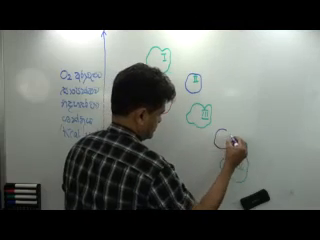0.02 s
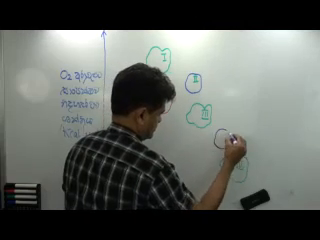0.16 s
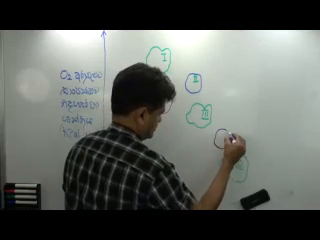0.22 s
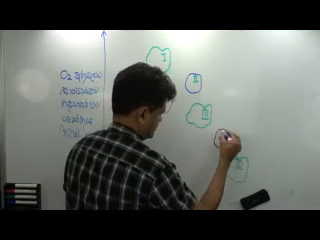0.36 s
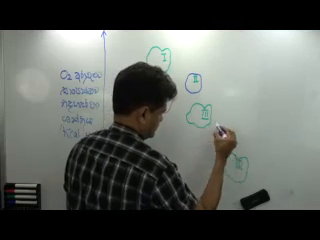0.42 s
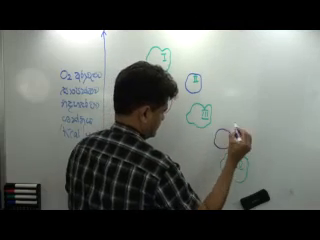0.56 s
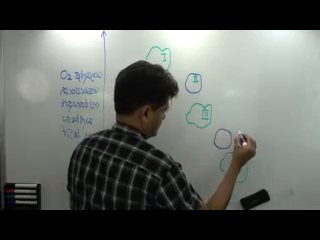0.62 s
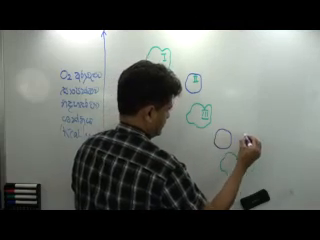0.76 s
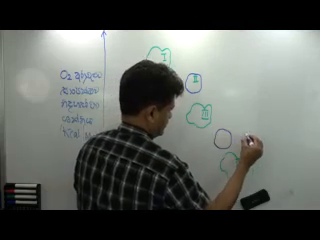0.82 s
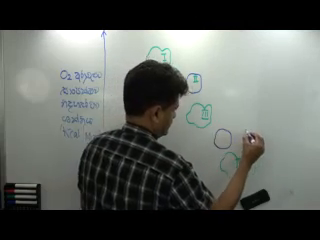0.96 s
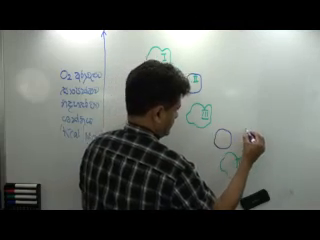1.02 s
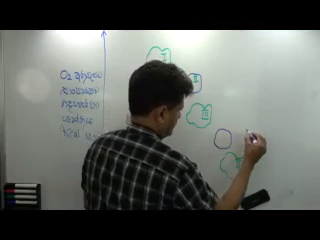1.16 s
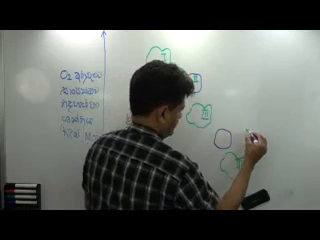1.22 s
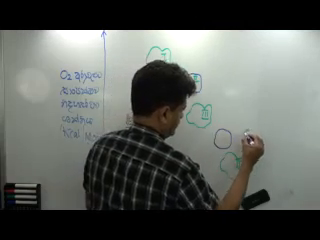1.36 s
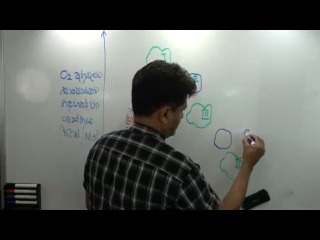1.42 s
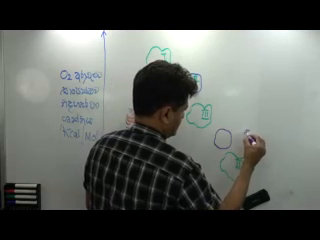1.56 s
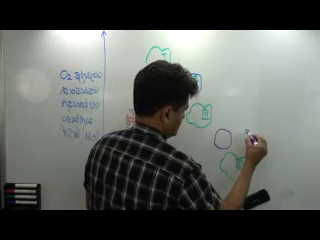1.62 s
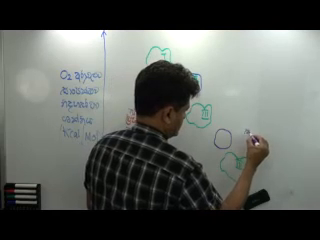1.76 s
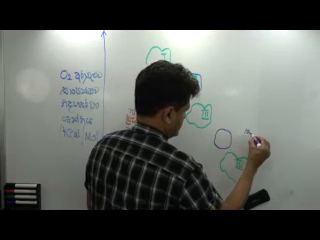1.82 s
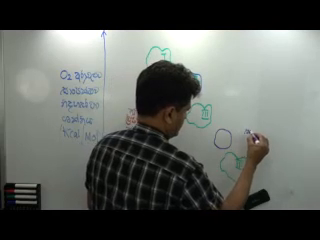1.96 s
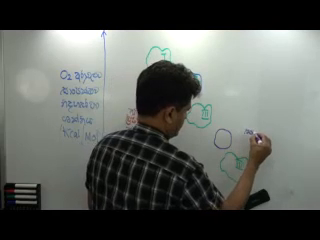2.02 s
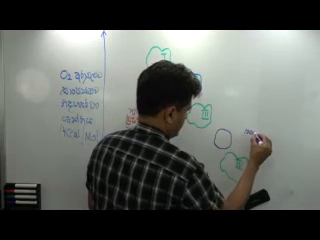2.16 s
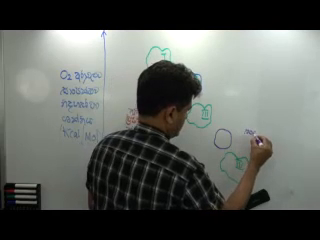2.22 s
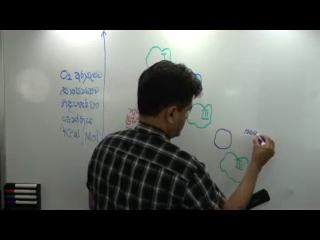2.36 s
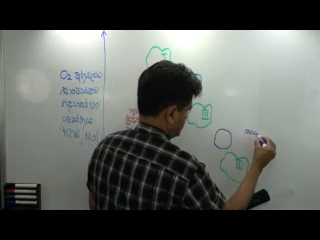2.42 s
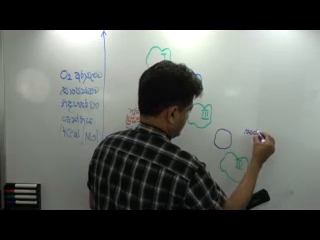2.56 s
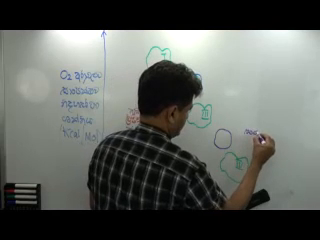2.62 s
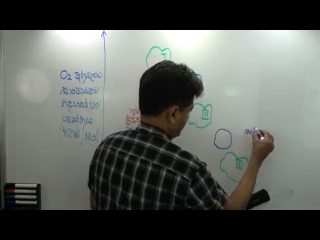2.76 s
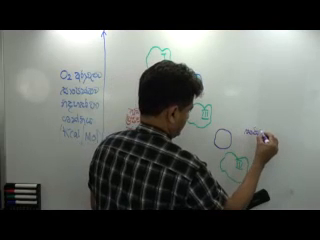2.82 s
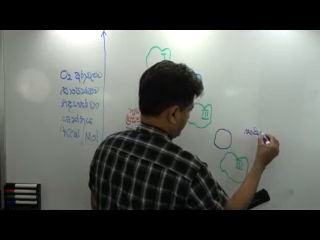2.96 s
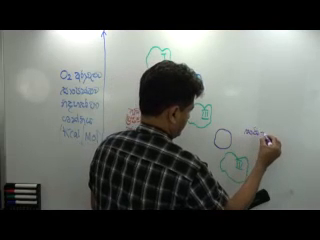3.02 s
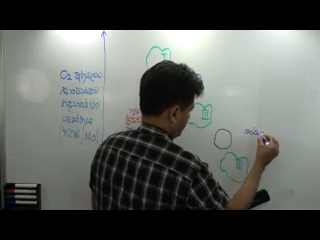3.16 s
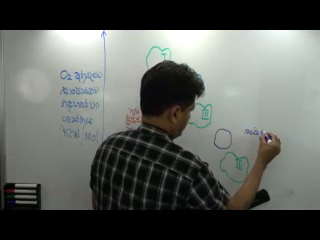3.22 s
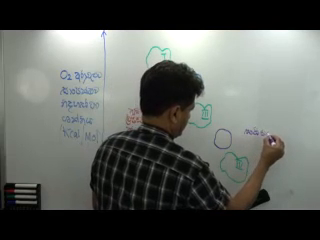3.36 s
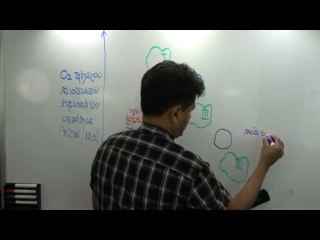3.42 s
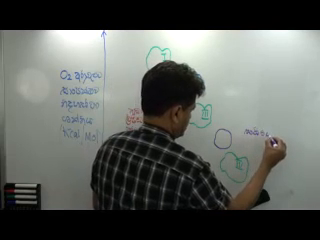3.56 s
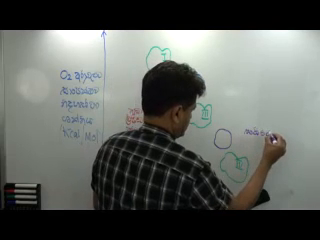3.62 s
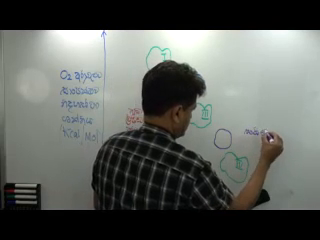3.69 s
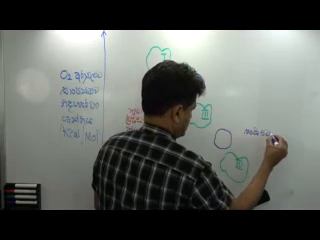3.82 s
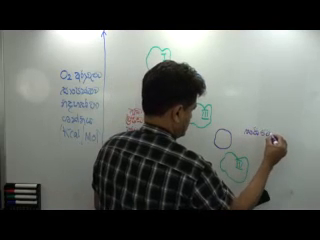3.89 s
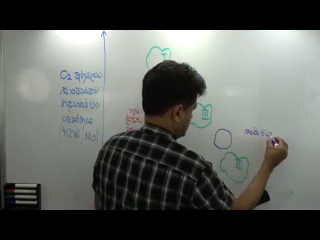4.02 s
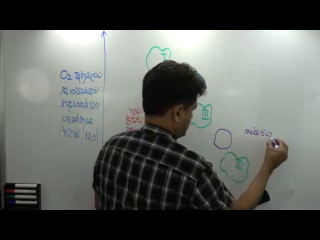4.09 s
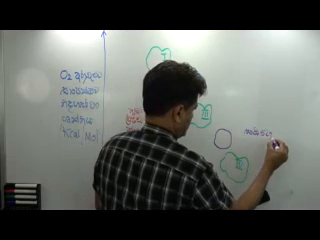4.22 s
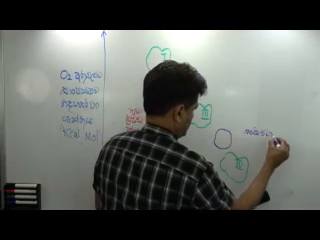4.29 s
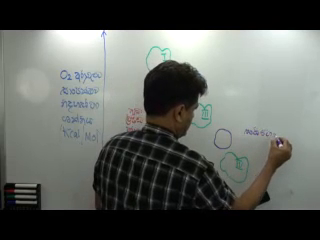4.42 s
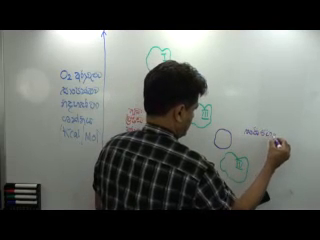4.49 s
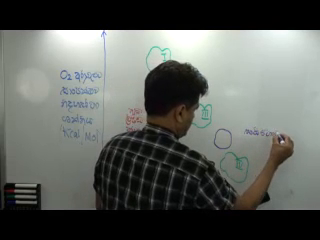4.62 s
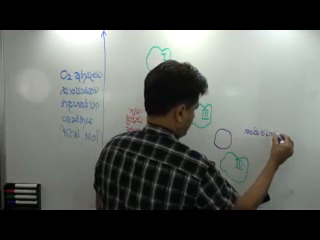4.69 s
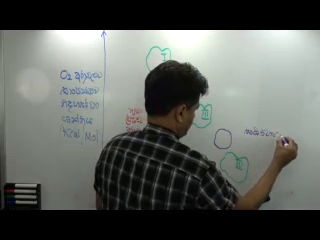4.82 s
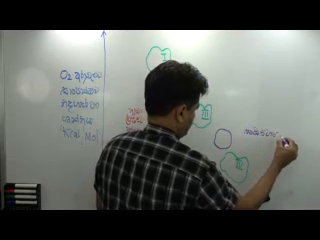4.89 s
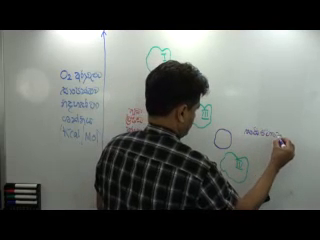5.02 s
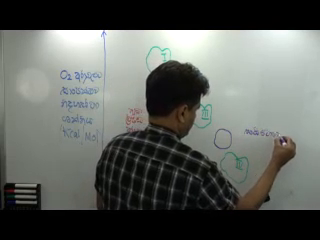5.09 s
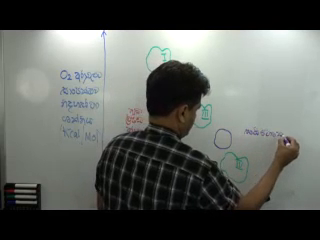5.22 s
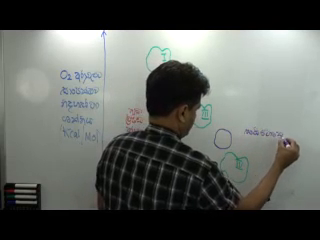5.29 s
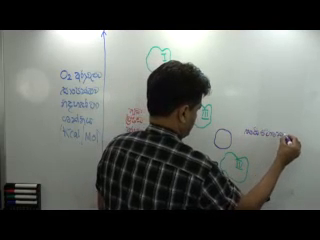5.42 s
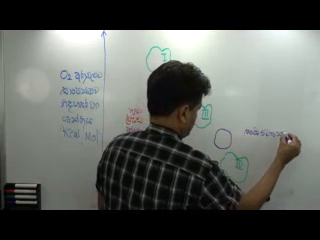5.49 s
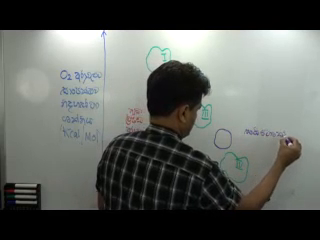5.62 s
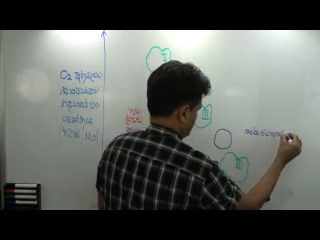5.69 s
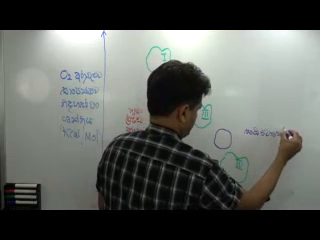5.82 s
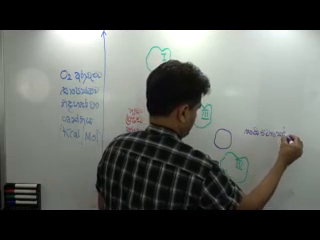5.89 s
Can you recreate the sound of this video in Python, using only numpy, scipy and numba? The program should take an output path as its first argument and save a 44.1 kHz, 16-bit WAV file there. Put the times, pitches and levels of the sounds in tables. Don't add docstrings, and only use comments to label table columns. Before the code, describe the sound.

In a quiet classroom a felt marker first rubs softly on a whiteboard, closing a circle, then pauses. From about one second it writes letters: hollow low thumps of the tip landing on the panel, tiny plastic clicks and short dry squeaks, quick at first and later more spaced. Heard from a few metres by a camera microphone, with a short room tail, faint fan noise and mains hum.

```python
import sys
import numpy as np
from scipy import signal
from scipy.fft import rfft, irfft, next_fast_len
from scipy.io import wavfile
from scipy.ndimage import uniform_filter1d
from numba import njit

SR = 44100
rng = np.random.default_rng(int(sys.argv[2]) if len(sys.argv) > 2 else 0)


def amplitude_ratio(level_db):
    exponent = np.asarray(level_db, float) / 20
    return 10 ** exponent


def to_wav(s):
    ch = np.atleast_2d(s).T
    pcm = np.round(np.clip(ch, -1, 1) * 32767)
    wavfile.write(sys.argv[1], SR, pcm.astype(np.int16))


N = 262615
T = np.arange(N) / SR
LEFT_RIGHT = np.array([[1], [-1]])

# start in seconds, peak level in dB, hardness as level of the upper modes in dB,
# wall shudder in dB, left minus right in dB.
LANDINGS = [(0.455, -84, -6, -53, 3), (1.156, -28, -28, -45, -1.5), (1.319, -47, -36, -50, 2.5),
            (1.367, -65, -10, -66, -5), (1.601, -27.5, -25.5, -37, 2.5), (1.827, -45, -31, -57, 3),
            (2.088, -30.5, -12, -52, 4.5), (2.214, -25.5, -30, -42, 2.5), (2.447, -53, -24, -52, 6),
            (2.483, -44, -37, -55, 4.5), (2.566, -38, -9.5, -58, 1.5), (2.689, -45, -19, -54, 2.5),
            (3.009, -31.5, -46, -45, -2), (3.437, -33, -38, -44, 1.5), (4.007, -34, -37, -43, 2),
            (4.43, -33.5, -38, -48, 2), (4.811, -25, -14.5, -45, 5.5), (5.01, -44, -13.5, -55, 5.5),
            (5.167, -42, -10.5, -50, 2), (5.569, -25, -17, -48, 1), (5.868, -22.5, -3, -62, 0.5)]
# frequency in Hz, level in dB, 60 dB decay time in seconds.
PANEL_MODES = [(95.7, -9.5, 0.19), (135.5, -11.5, 0.16), (159, -1, 0.097), (190.3, -8, 0.11),
               (195.3, 4.5, 0.1), (211.6, -11.5, 0.19), (252.4, -20, 0.2), (285, -14, 0.068),
               (344.2, 5.5, 0.14), (388.4, 0, 0.2), (448, -10.5, 0.35), (498, 10, 0.071),
               (538.2, 6.5, 0.08), (607, -6, 0.26), (699.3, -6.5, 0.15), (795, -6.5, 0.094),
               (815, -35, 0.089), (960, -6.5, 0.015)]
# start in seconds, peak level in dB, treble in dB, strongest ring in Hz,
# left minus right in dB.
BARREL_TICKS = [(0.867, -54, -5, 2080, 1.5), (1.044, -68.5, 5, 1070, -0.5), (1.9519, -52.5, -20, 1530, -2),
                (2.1039, -40, -2, 1090, -2.5), (2.5641, -28, -12, 1100, 2), (2.77, -51, -6, 1530, 3.5),
                (3.521, -52, -4.5, 1500, -3.5), (4.844, -50.5, -28, 1120, -4),
                (5.0124, -54.5, -29, 1090, -1), (5.1718, -49, -34, 1120, -3), (5.8723, -46, -13, 1180, -5)]
# frequency in Hz, width in Hz, level in dB.
BARREL_RINGS = [(753, 145, -5.5), (1090, 100, 2), (1388, 58, 0), (1530, 94, 3), (1690, 22, -1.5),
                (1818, 74, -1), (2130, 143, -4.5), (2575, 47, -8.5), (1610, 490, -9.5)]
# frequency in Hz, width in Hz,
# level in dB.
TIP_RINGS = [(3920, 580, -2.5), (4150, 460, -2.5), (4455, 77, -5), (5430, 1400, -3), (8300, 4100, -8.5),
             (2960, 1200, -8)]
# frequency in Hz, width in Hz, level in dB.
SLANTED_RINGS = [(770, 63, -1), (1100, 63, -2.5), (1402, 55, 3.5), (2020, 83, -3), (1500, 1150, -16.5)]
# start in seconds, hold at full speed in seconds, rub in
# dB, squeak in dB, squeak pitch in Hz.
PEN_STROKES = [(0.0, 0.17, -66, -69.5, 4150), (0.223, 0.21, -63.5, -83, 3770),
               (0.429, 0.019, -70, -63, 3850), (0.52, 0.18, -78, -84, 4000),
               (1.262, 0.11, -74, -77, 3980), (1.401, 0.048, -71.5, -67, 4150),
               (1.626, 0.06, -74.5, -84, 4150), (1.73, 0.062, -68, -74, 4130),
               (1.856, 0.074, -69, -68, 3990), (2.03, 0.022, -60.5, -63.5, 3890),
               (2.148, 0.02, -73, -80, 3870), (2.225, 0.14, -71, -76, 3970),
               (2.354, 0.038, -68.5, -68, 4000), (2.406, 0.025, -67, -77, 3860),
               (2.511, 0.015, -64.5, -63.5, 4200), (2.57, 0.075, -57, -63.5, 4010),
               (2.778, 0.031, -60.5, -63.5, 3840), (2.82, 0.045, -62, -64, 4130),
               (3.081, 0.09, -71.5, -70.5, 4030), (3.236, 0.068, -62.5, -59.5, 4113),
                 (3.291, 0.05, -73, -66, 4200), (3.554, 0.059, -75, -68, 4210),
                 (3.626, 0.13, -68, -72, 3970), (3.738, 0.032, -62, -54, 4130),
                 (4.063, 0.049, -75, -70.5, 4130), (4.086, 0.024, -68, -72, 4340),
                 (4.452, 0.14, -79, -79, 4060), (4.616, 0.058, -66, -64, 4030),
                 (4.885, 0.04, -72, -66.5, 4130), (5.045, 0.06, -73, -72.5, 4070),
                 (5.206, 0.081, -65.5, -70, 4290), (5.302, 0.055, -66, -62.5, 4150),
                 (5.592, 0.025, -68, -73, 4330), (5.635, 0.037, -72, -69.5, 4230),
                 (5.875, 0.11, -70, -70.5, 4100)]
# time in seconds, level in dB.
HAND_PRESSURE = [(0.0, -76), (1.16, -80), (1.33, -77), (1.61, -73), (1.76, -66), (1.92, -68.5), (2.15, -74),
                 (2.32, -63.5), (2.8, -75), (3.61, -71), (3.96, -83), (4.44, -72), (4.87, -71), (5.07, -65),
                 (5.34, -74), (5.62, -77), (5.77, -68.5), (5.95, -55)]
# frequency in Hz, 60 dB decay time in seconds.
ROOM_DECAY = [(100, 0.37), (500, 0.33), (2000, 0.18), (8000, 0.16)]
# frequency in Hz, share of the tail in dB.
ROOM_COLOUR = [(100, -3.5), (300, -13.5), (700, -10.5), (2000, -1), (8000, -4.5)]
# frequency in Hz, level in dB per Hz.
AIR_COLOUR = [(15, -68), (25, -13), (70, -12), (127, -4), (152, -17.5), (241, -3), (312, -12), (364, -8),
              (694, -10.5), (853, -10), (1460, -16.5), (1670, -18.5), (1800, -18.5), (2940, -20),
              (11800, -23), (15300, -49), (22000, -120)]
# frequency in Hz, side minus mid in dB.
AIR_WIDTH = [(60, -32), (110, 0.5), (190, -4), (340, -2.5), (620, -7.5), (1100, -4.5), (1980, -5.5),
             (3540, -12), (6340, 1.5), (11400, -5)]
# frequency in Hz, level in dB.
MAINS_HUM = [(120, -79), (240, -74.5)]
STROKES = PEN_STROKES


def level(x, db):
    return x * amplitude_ratio(db) / np.sqrt(np.mean(x ** 2))


def fade(t, t60):
    return np.exp(-np.log(1000) * t / t60)


def on_log(table, hz):
    f, value = np.transpose(table)
    return np.interp(np.log(np.maximum(hz, 1)), np.log(f), value)


def coloured(x, gain):
    size = next_fast_len(x.shape[-1])
    hz = np.arange(size // 2 + 1) * SR / size
    return irfft(rfft(x, size) * gain(hz), size)[..., :x.shape[-1]]


def resonances(table):
    def response(hz):
        total = 0
        for k, (centre, width, db) in enumerate(table):
            damping = 1j * hz * width
            total = total + (-1) ** k * amplitude_ratio(db) * damping / (centre * centre - hz * hz + damping)
        return total
    return response


def walk(rate):
    k = int(SR / rate)
    steps = np.repeat(rng.standard_normal(N // k + 1), k)
    return 1.3 * uniform_filter1d(uniform_filter1d(steps, k), k)[:N]


def add(out, sound, s, db, pan_db):
    i = int(s * SR)
    gains = amplitude_ratio(db + np.array([pan_db, -pan_db]) / 2)
    out[:, i:i + len(sound)] += np.outer(gains, sound[:N - i])


@njit
def moving_bandpass(x, hz, width):
    y, band, low = np.empty(len(x)), 0., 0.
    for i in range(len(x)):
        g, k = np.tan(np.pi * hz[i] / SR), width / hz[i]
        v = (band + g * (x[i] - low)) / (1 + g * (g + k))
        band, low, y[i] = 2 * v - band, low + 2 * g * v, k * v
    return y


def wall_shudder(t):
    return np.sin(2 * np.pi * 47.2 * t) * (1 - np.exp(-t / 0.062)) ** 2 * fade(t, 0.36)


def dense_modes(t, upper_db, mid_db):
    crowd = resonances([(157, 54, -11.5), (384, 116, mid_db), (550, 156, upper_db), (950, 260, upper_db - 17)])
    rumble = coloured(rng.standard_normal(len(t)), lambda f: crowd(f) / (1 + (f / 1400) ** 4))
    return rumble * (1 - np.exp(-t / 0.0033)) * amplitude_ratio(16.5) * fade(t, 0.22)


def landings():
    lead_s, upper_pan_db = 0.00056, -3.5
    early_s, early_db = 0.01024, -23
    out, t = np.zeros((2, N)), T[:SR // 2]
    hz, db, t60 = (column[:, None] for column in np.transpose(PANEL_MODES))
    low, upper = hz < 310, hz > 480
    rise = (1 - np.exp(-t / np.where(upper, 0.0019, 0.0041))) ** 2
    wall = wall_shudder(t)
    for s, peak_db, upper_db, wall_db, pan_db in LANDINGS:
        mid_db = -7.5 + 0.37 * upper_db
        reach_db = np.where(low, 0, np.where(upper, upper_db, mid_db))
        spot_db, detune = rng.standard_normal((2, len(PANEL_MODES), 1))
        strength = amplitude_ratio(db + reach_db + 1.0 * spot_db)
        tones = np.sin(2 * np.pi * hz * (1 + 0.0036 * detune) * t)
        rings = -rise * strength * tones * fade(t, t60)
        thump = rings[low[:, 0]].sum(axis=0)
        knock = rings[~low[:, 0]].sum(axis=0) + dense_modes(t, upper_db, mid_db)
        add(out, thump, s - lead_s, peak_db, pan_db)
        add(out, knock, s - lead_s, peak_db, pan_db + upper_pan_db)
        add(out, rings.sum(axis=0), s - early_s, peak_db + early_db, pan_db)
        add(out, wall, s, wall_db, pan_db)
    return out


def barrel_ticks():
    rattle_s, crack_s, crack_db = 0.012, 0.0008, 6
    out, t = np.zeros((2, N)), T[:SR // 4]
    barrel_body = resonances(BARREL_RINGS)
    tip_body = resonances(TIP_RINGS[:2] + [(5600, 500, -6), (3200, 900, -13), (7500, 1200, -14)])
    for s, peak_db, treble_db, ring_hz, pan_db in BARREL_TICKS:
        envelope = np.exp(-t / rattle_s) + amplitude_ratio(crack_db) * np.exp(-t / crack_s)
        rattle = rng.standard_normal(len(t)) * envelope
        favoured = resonances([(ring_hz, 500, -3)])
        barrel = coloured(rattle, lambda f: barrel_body(f) * (0.42 + favoured(f)))
        tip = coloured(rattle, lambda f: tip_body(f) / (1 + (f / 8200) ** 6))
        tick = barrel / barrel.max() + amplitude_ratio(treble_db) * tip / tip.max()
        add(out, tick, s - 0.001, peak_db + 1.5, pan_db)
    return out


def swell(db, rise_s, fall_s):
    start, hold = np.transpose(STROKES)[:2, :, None]
    before = np.maximum((start - T) / rise_s, 0)
    after = np.maximum((T - start - hold) / fall_s, 0)
    return amplitude_ratio(db)[:, None] * np.exp(-(before + after))


def felt_rub(slips):
    chatter_hz, width_hz = np.full(N, 1527.), 89.0
    wandering = moving_bandpass(slips, chatter_hz * (1 + 0.075 * walk(25)), width_hz)
    chatter = moving_bandpass(wandering, chatter_hz, 3 * width_hz)
    upright = level(coloured(slips, resonances(BARREL_RINGS)), -1.1) + level(chatter, -22.0)
    slanted = level(coloured(slips, resonances(SLANTED_RINGS)), -0.5)
    return np.where((T > 0.2) & (T < 0.6), slanted, upright)


def felt_squeak(slips, tip_hz):
    width_hz = 172.0
    wandering = moving_bandpass(slips, tip_hz * (1 + 0.024 * walk(20)), width_hz)
    narrow = moving_bandpass(wandering, tip_hz, 3 * width_hz)
    tip, focus = resonances(TIP_RINGS[:3]), resonances([(4100, 1300, 0)])
    return level(narrow, -2.8) + level(coloured(slips, lambda f: tip(f) * focus(f)), -6)


def felt_strokes():
    pan_db, hiss_spread = -2.5, 0.28
    start, _, rub_db, squeak_db, start_hz = np.transpose(STROKES)
    hiss_db = -67.5 + 0.51 * (squeak_db + 59.5)
    rub_swell = swell(rub_db, 0.02, 0.036).max(axis=0)
    squeak_swells = swell(squeak_db, 0.014, 0.022)
    hiss_swell = swell(hiss_db, 0.053, 0.049).max(axis=0)
    now = squeak_swells.argmax(axis=0)
    climb_hz = 99 * np.tanh((T - start[now]) / 0.065)
    tip_hz = uniform_filter1d(start_hz[now] + climb_hz, size=400)
    slips = rng.standard_normal((4, N)) * amplitude_ratio(1.5 * walk(60))
    rub = felt_rub(slips[0]) * rub_swell
    squeak = felt_squeak(slips[1], tip_hz) * squeak_swells.max(axis=0)
    mid, side = level(coloured(slips[2:], resonances(TIP_RINGS[3:])), -0.43) * hiss_swell
    return (rub + squeak + mid) * amplitude_ratio(LEFT_RIGHT * pan_db / 2) + hiss_spread * side * LEFT_RIGHT


def hand_press():
    panel = resonances([(100, 50, -4), (190, 40, 0)])
    groan = coloured(rng.standard_normal(N), lambda f: panel(f) / (1 + (f / 330) ** 4))
    s, db = np.transpose(HAND_PRESSURE)
    return level(groan, -0.091) * amplitude_ratio(np.interp(T, s, db))


def room(x):
    echo_s, echo_db, tail_db = 0.043, -15.5, -6.5
    t, tail = T[:SR // 2], 0
    for hz in 60 * 2. ** np.arange(8):
        noise = rng.standard_normal((2, len(t)))
        mid, side = coloured(noise, lambda f: np.exp(-np.log2((f + 1) / hz) ** 2 * 2))
        wide = np.clip(hz / 18600.0, 0, 1)
        decay = fade(t, on_log(ROOM_DECAY, hz)) * amplitude_ratio(on_log(ROOM_COLOUR, hz)) * (1 - np.exp(-t / 0.0017))
        tail = tail + (mid + wide * side * LEFT_RIGHT) * decay
    tail *= amplitude_ratio(tail_db) / np.sqrt(np.sum(tail ** 2) / 2)
    tail[:, int(echo_s * SR)] += amplitude_ratio(echo_db)
    return x + signal.fftconvolve(x, tail, axes=1)[:, :N]


def air():
    mid = coloured(rng.standard_normal(N), lambda f: amplitude_ratio(on_log(AIR_COLOUR, f)))
    side = coloured(rng.standard_normal(N), lambda f: amplitude_ratio(on_log(AIR_COLOUR, f) + on_log(AIR_WIDTH, f)))
    noise = level(mid + side * LEFT_RIGHT, -66.5) * amplitude_ratio(0.5 * walk(2.6))
    fan = resonances([(1118, 136, 0)])
    whine = level(coloured(rng.standard_normal(N), lambda f: fan(f) ** 2), -76.5)
    hum = sum(amplitude_ratio(db + 0.94 * walk(10)) * np.sin(2 * np.pi * hz * T) for hz, db in MAINS_HUM)
    return noise + whine + hum


def scene():
    return room(landings() + barrel_ticks() + felt_strokes() + hand_press()) + air()


def top_cut(x):
    return signal.sosfilt(signal.butter(12, 11950, fs=SR, output="sos"), x)


def record(dry):
    low_pass = signal.ellip(10, 0.2, 60, 11750, fs=SR, output="sos")
    mix = signal.sosfilt(low_pass, dry)
    return top_cut(mix)


dry = scene()
out = record(dry)
to_wav(out)
```